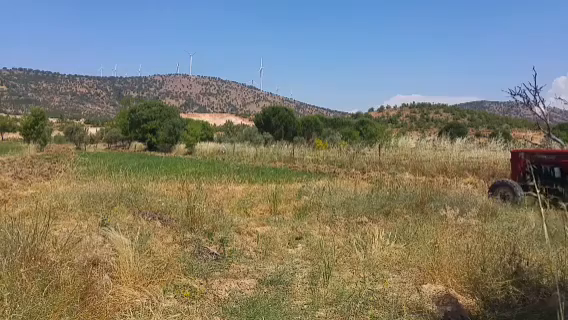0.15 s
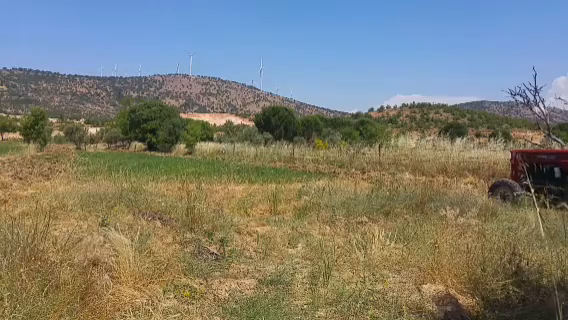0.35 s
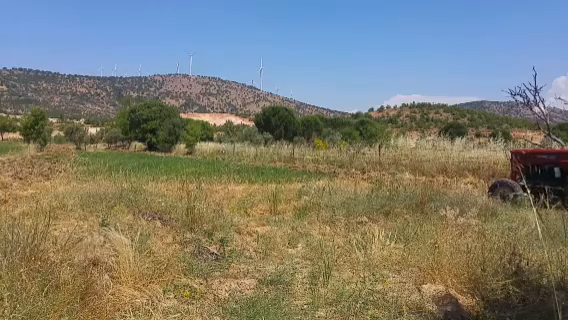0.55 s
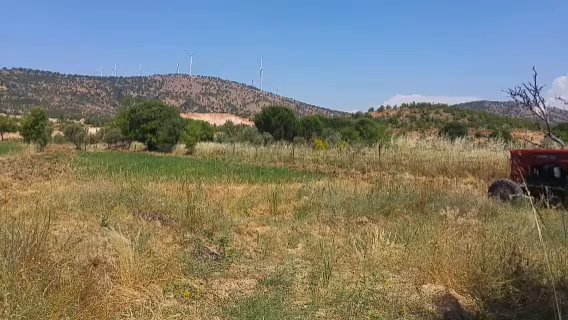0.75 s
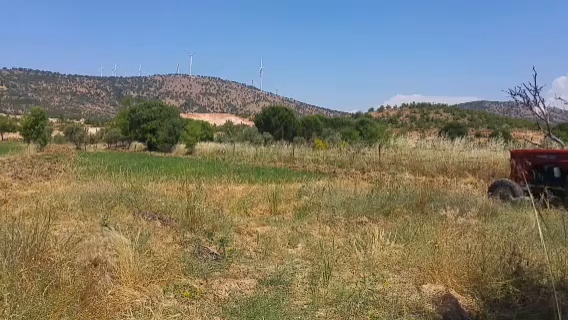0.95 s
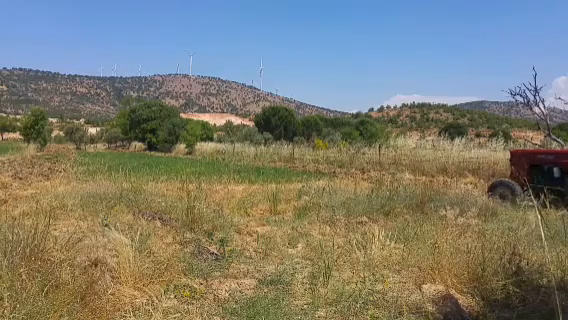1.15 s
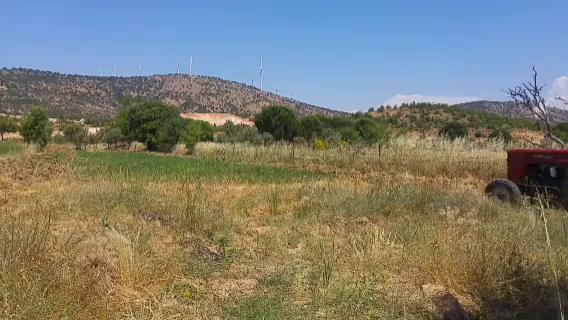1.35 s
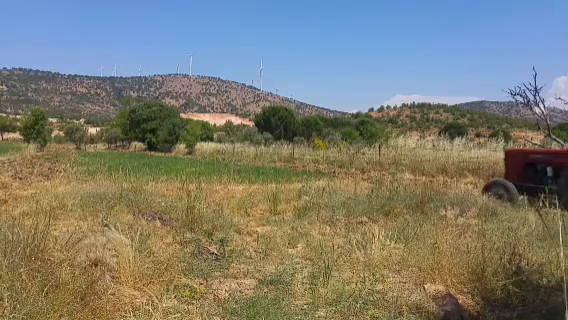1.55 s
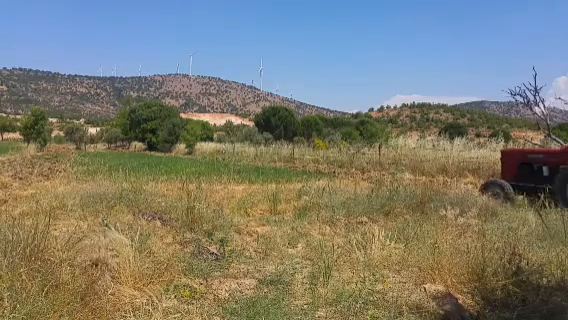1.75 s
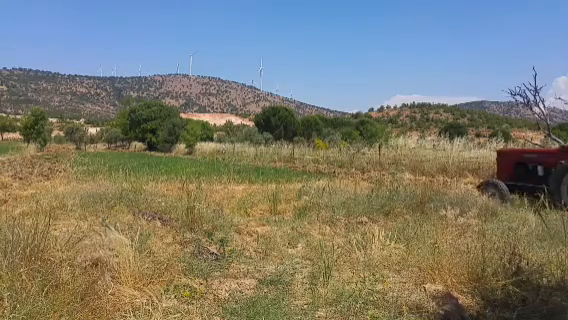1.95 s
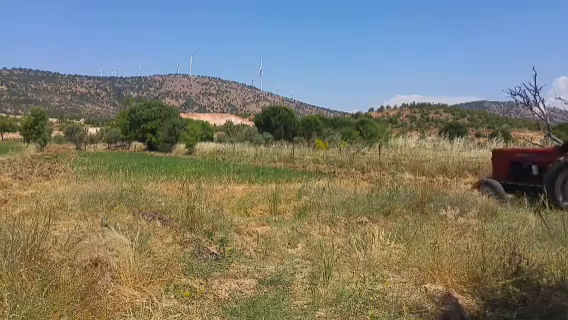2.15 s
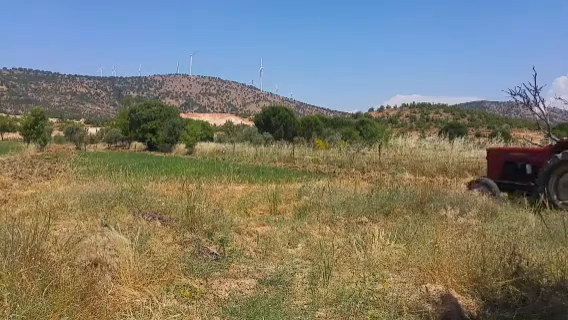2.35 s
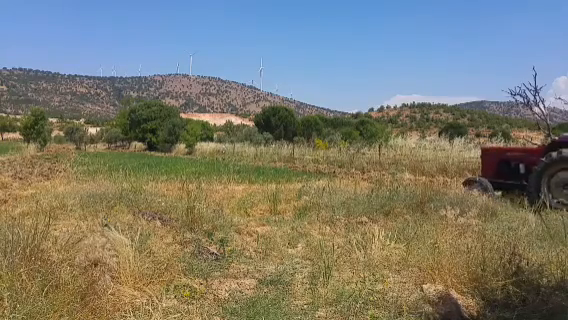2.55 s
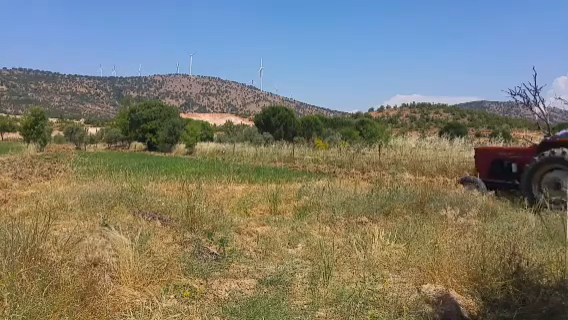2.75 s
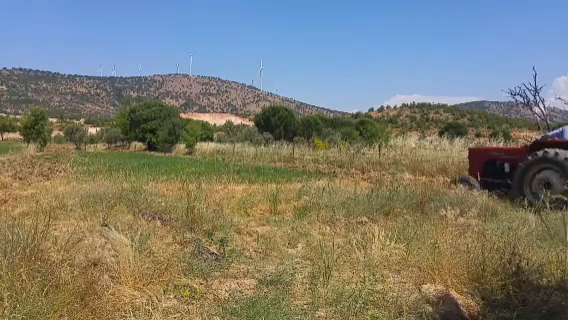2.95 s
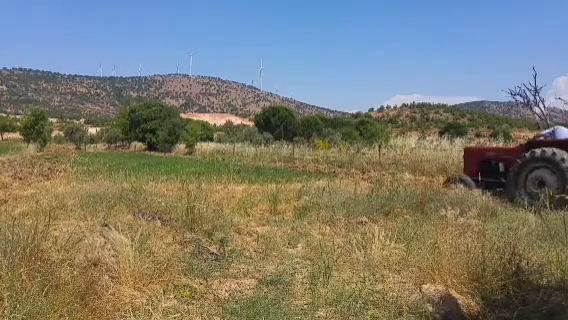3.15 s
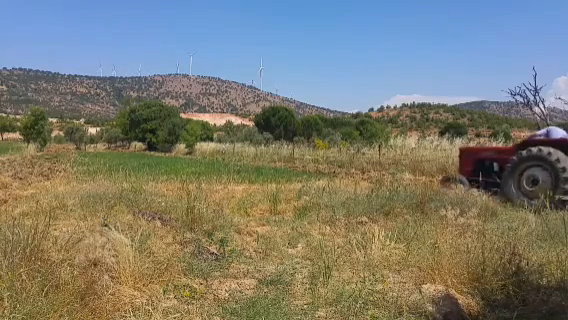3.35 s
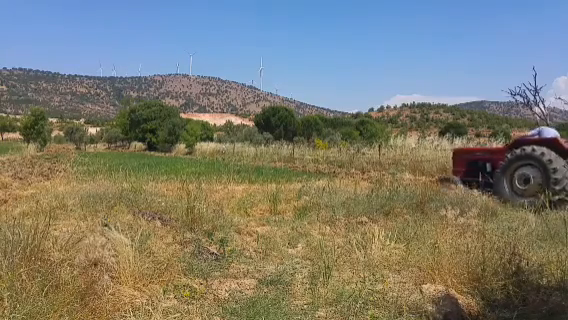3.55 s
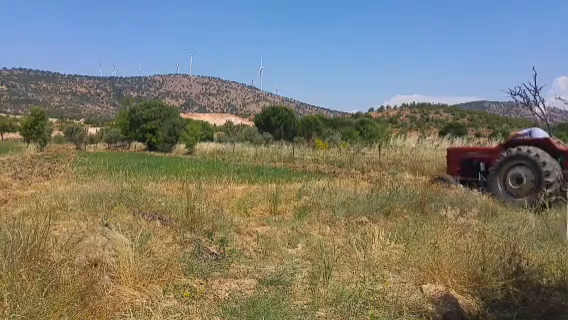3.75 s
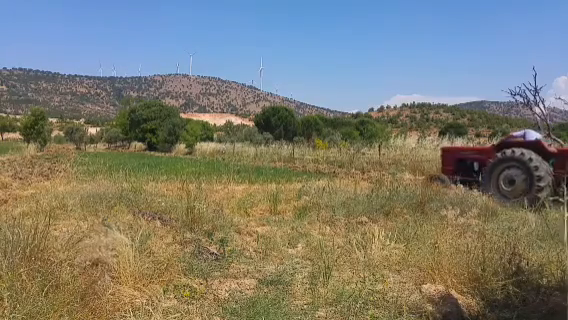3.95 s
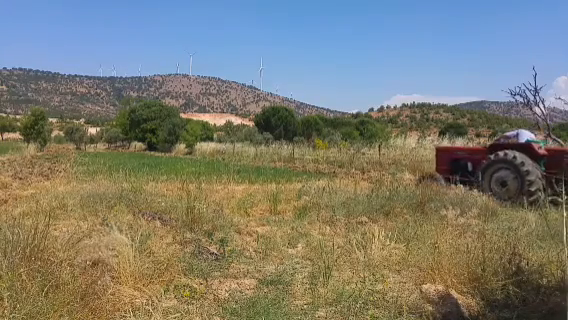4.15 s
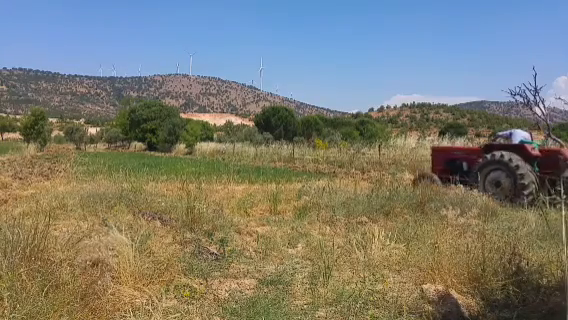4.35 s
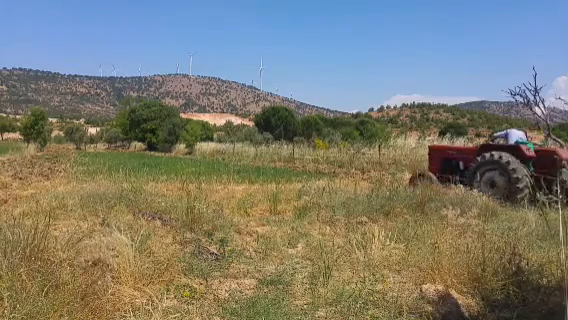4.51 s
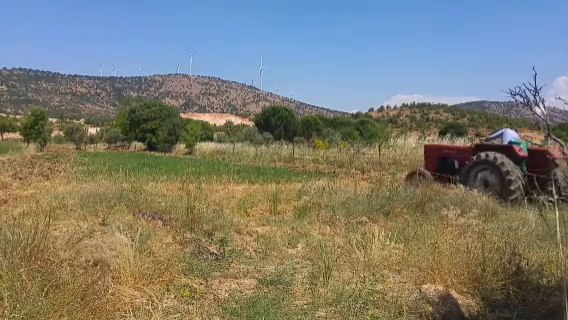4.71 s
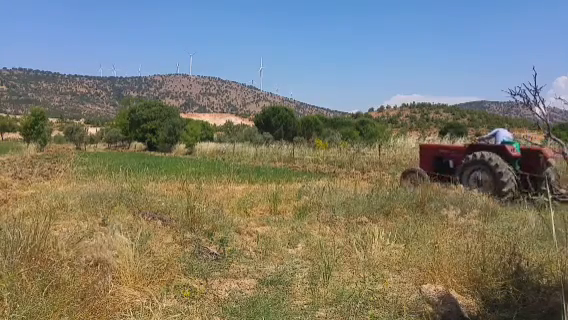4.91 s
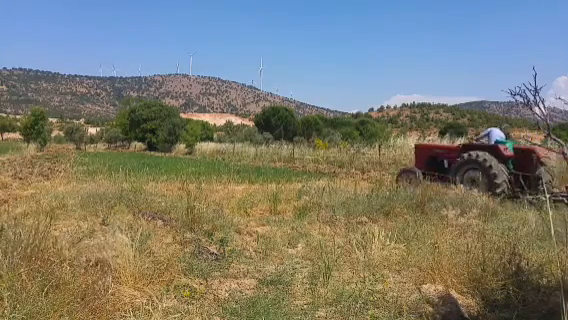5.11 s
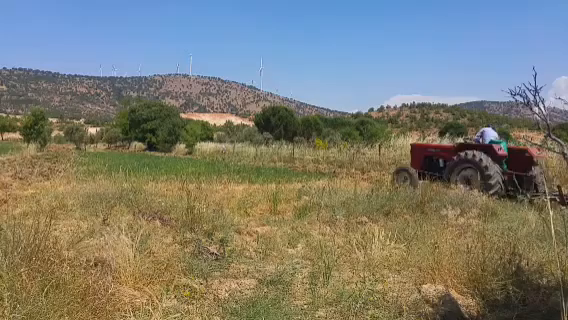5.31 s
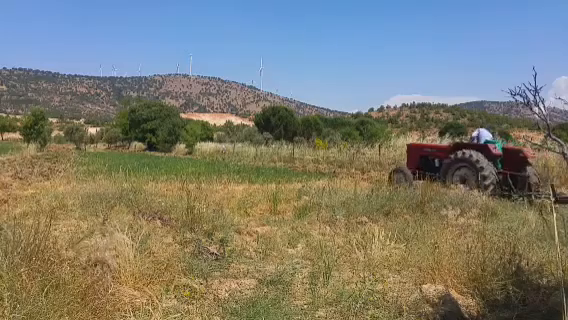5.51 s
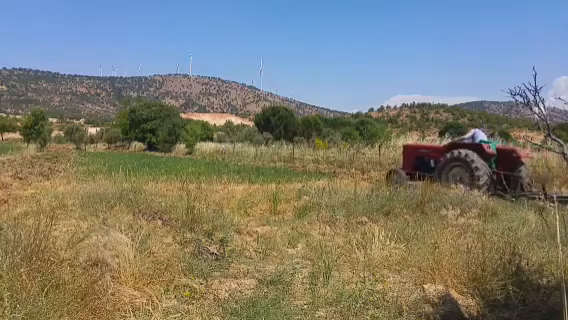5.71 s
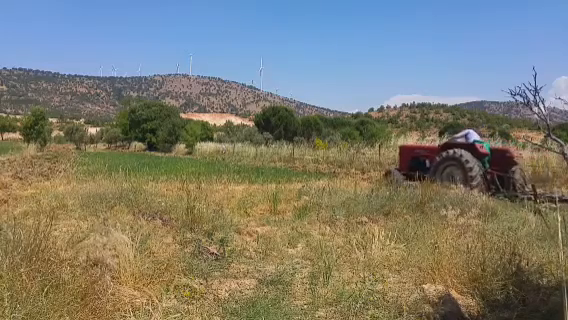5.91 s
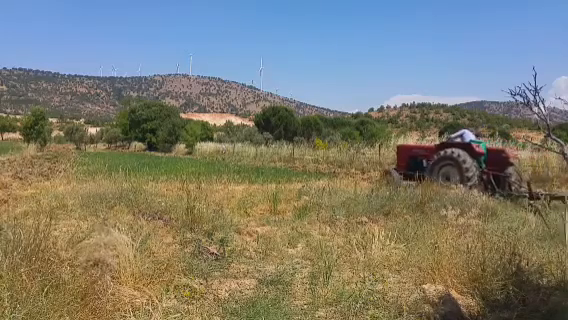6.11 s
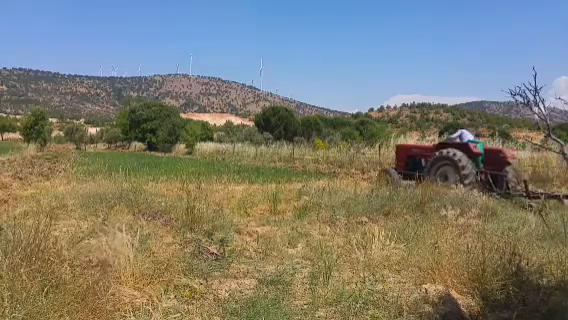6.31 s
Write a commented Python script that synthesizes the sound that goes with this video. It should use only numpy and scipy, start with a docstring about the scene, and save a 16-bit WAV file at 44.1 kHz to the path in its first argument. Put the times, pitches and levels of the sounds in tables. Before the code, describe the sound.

An old three-cylinder diesel tractor idles with a lumpy clatter, revs up in knocking bursts, then works at a steady drone while towed steel clanks.

```python
"""A three-cylinder diesel tractor idles, then revs up under pushes of the throttle and works a harrow at steady speed.
Each firing thumps and barks through the exhaust, shakes the block and rings the intake duct; pushes make it knock.
The harrow's frame booms early; its steel joints clank early and late, with short high notes: a ring, later squeaks.
Late on, a thin metallic tick comes once per engine cycle. Diffuse noise and a fading low hum lie under it all.
The tractor stands to the right: the left microphone hears it later and duller."""
import sys
import numpy as np
from scipy import signal
from scipy.fft import rfft, irfft, next_fast_len
from scipy.io import wavfile
from scipy.ndimage import map_coordinates

SR = 44100
rng = np.random.default_rng(int(sys.argv[2]) if len(sys.argv) > 2 else 0)


def store_wav(level_fs):
    """Save 16-bit WAV to argv[1]."""
    pcm = np.round(np.clip(np.atleast_2d(level_fs), -1, 1) * 32767)
    wavfile.write(sys.argv[1], SR, pcm.T.astype(np.int16))


N = 280917

# The cylinders in firing order. Each row: exhaust level in dB, clatter level in dB, valve click level in dB.
CYLINDERS = [(-2, 4, 1.5), (-2, 4.5, 1), (-2.5, 1.1, -1.8)]

IDLE_RATE = 12.4  # firings per second
BARK_ANGLE = 0.062  # share of a firing interval


def amp(db):
    """Decibels to gain."""
    return 10 ** (np.asarray(db) / 20)


def unit(x):
    """Scale to rms 1."""
    return x / np.sqrt(np.mean(x ** 2) + 1e-20)


def curves(rows):
    """One value per sample for each column after the time."""
    s, *cols = np.transpose(rows)
    return [np.interp(np.arange(N) / SR, s, c) for c in cols]


def wobble(rate):
    """A smooth random curve, rate knots a second."""
    knots = rng.standard_normal(int(N * rate / SR) + 4)
    return map_coordinates(knots, [np.arange(N) * rate / SR])


def response(points, size=8192):
    """Causal, minimum-phase impulse response with the given (Hz, dB) spectrum."""
    f, db = np.transpose(points)
    log_hz = np.log(np.fft.rfftfreq(size, 1 / SR) + 1)
    gain = amp(np.interp(log_hz, np.log(f), db))
    cepstrum = irfft(np.log(gain))
    cepstrum[1:size // 2] *= 2
    cepstrum[size // 2 + 1:] = 0
    return irfft(np.exp(rfft(cepstrum)))


def resonances(modes):
    """Impulse response of (Hz, width Hz, dB) modes, with energy 1."""
    hz = np.fft.rfftfreq(SR // 4, 1 / SR)
    spectrum = 0
    for k, (centre, width, db) in enumerate(modes):
        mode = 1j * hz * width / (centre * centre - hz * hz + 1j * hz * width)
        spectrum = spectrum + (-1) ** k * amp(db) * mode
    ring = irfft(spectrum)
    return ring / np.linalg.norm(ring)


def through(x, impulse):
    """Convolve, keeping the scene's length."""
    return signal.oaconvolve(x, impulse)[:N]


def noise(points):
    """Coloured noise of rms 1."""
    return unit(through(rng.standard_normal(N), response(points)))


def pulses(phase, marks, sizes):
    """An impulse wherever the firing count passes a mark."""
    at = np.searchsorted(phase, marks)
    heard = (at > 0) & (at < N)
    return np.bincount(at[heard], sizes[heard], N)


def after_firing(phase, rate, lead, rise):
    """A quick swell and slower fade, starting lead s before each firing, with mean near 1."""
    u = (phase + lead * rate) % 1 / rate / rise
    return u ** 2 * np.exp(-u) / (2 * rise * rate)


def throttle():
    """How far the driver's pushes open the throttle beyond what the speed needs, 0-1."""
    # Each row: start in s, start of the fall in s, share of the remaining fuel that it adds.
    push_rows = [(1.228, 2.095, 0.14), (1.54, 1.59, 0.63), (2.1, 2.477, 0.68)]
    rise_s, fall_s = 0.06, 0.29
    t = np.arange(N) / SR
    push = np.zeros(N)
    for start, end, share in push_rows:
        opening = np.clip((t - start) / rise_s, 0, 1)
        closing = np.clip(1 - (t - end) / fall_s, 0, 1)
        push += (1 - push) * share * opening * closing
    return np.clip(push, 0, 1)


def fuel_flow(rate, push):
    """Share of full fuel: what the speed needs, the governor's limited correction, and the driver's pushes."""
    work_rate, work_fuel = 29, 0.47  # firings per second, share of full fuel
    governor_gain = 0.023  # fuel share per firing per second below work_rate
    work = np.clip((rate - IDLE_RATE) / (work_rate - IDLE_RATE), 0, 1)
    fuel = np.sqrt(work) * (work_fuel + governor_gain * np.clip(work_rate - rate, -1, 1))
    return np.clip(fuel + (1 - fuel) * push, 0, 1)


def loudness(law, rate, fuel):
    """Level in dB of one part of the engine: it grows with speed and with fuel."""
    idle_db, speed_db, fuel_db, exponent = law
    return idle_db + speed_db * np.log2(rate / IDLE_RATE) + fuel_db * fuel ** abs(exponent)


def thump(phase, rate, delay=.01, width=.008, scatter_db=.4):
    """Each firing sends out one round puff; at working speed the puffs merge into a hum at twice the firing rate."""
    # Puff pitch against speed. Each row: firings per second, centre in Hz.
    puff_rows = [(12.5, 67.5), (22, 80), (33, 90), (40, 86.3)]
    firing = np.arange(int(phase[-1]) + 3)
    cylinder_db = np.array(CYLINDERS)[firing % len(CYLINDERS), 0]
    sizes = amp(cylinder_db + scatter_db * rng.standard_normal(len(firing)))
    hz = np.interp(rate, *np.transpose(puff_rows))
    out = np.zeros(N)
    for neighbour in range(-1, 2):
        k = phase.astype(int) + neighbour
        t = (phase - k) / rate - delay
        out += sizes[k] * np.cos(2 * np.pi * hz * t) * np.exp(-.5 * (t / width) ** 2)
    return out / np.sqrt(rate * width)


def gas_pulses(phase, rate, angle, spectrum, scatter_db):
    """One sharp pressure front per firing, at a fixed crank angle, rings a duct."""
    firing = np.arange(int(phase[-1]) + 1)
    cylinder_db = np.array(CYLINDERS)[firing % len(CYLINDERS), 0]
    sizes = amp(cylinder_db + scatter_db * rng.standard_normal(len(firing)))
    duct = response(spectrum)
    duct = duct / np.linalg.norm(duct)
    return -through(pulses(phase, firing + angle, sizes), duct) * np.sqrt(SR / rate)


def exhaust_bark(phase, rate):
    """The pressure front of each firing rings the exhaust pipe."""
    # Each row: frequency in Hz, relative level in dB.
    pipe = [(50, -22), (110, 8), (165, -4.5), (200, 0), (250, -6), (300, -8), (360, -8), (450, -19),
            (700, -37), (1100, -60)]
    return gas_pulses(phase, rate, BARK_ANGLE, pipe, scatter_db=1.5)


def intake_gulp(phase, rate):
    """A gulp after each firing rings the intake duct, which turns away from the microphones and fades."""
    # Each row: frequency in Hz, relative level in dB.
    intake_duct = [(50, -15), (95, 1), (118, -19), (140, -5), (165, 4.5), (200, 6.5), (240, 3), (280, -9.5),
                   (350, -20), (400, -14), (560, -8.5), (650, -22), (730, -22.5), (1100, -27.5)]
    # Each row: time in s, level in dB.
    intake_facing = [(4.3, 1), (4.8, -1)]
    gulps = gas_pulses(phase, rate, .63, intake_duct, scatter_db=0.6)
    return amp(curves(intake_facing)[0]) * gulps


def strikes(phase, rate, ring_t60, cylinder_db, count=12):
    """Valves, pistons and pump strike near fixed crank angles; each part has its own ring and differs by cylinder."""
    firing = np.arange(int(phase[-1]) + 1)
    t = np.arange(SR // 10) / SR
    out = np.zeros(N)
    for angle in (np.arange(count) + rng.random(count)) / count:
        # columns of both: timing, level
        habit = rng.uniform(-1, 1, (len(CYLINDERS), 2))[firing % len(CYLINDERS)]
        chance = rng.uniform(-0.92, 1, (len(firing), 2))
        marks = firing + angle + .007 * habit[:, 0] + .0016 * chance[:, 0]
        sizes = amp(cylinder_db * habit[:, 1] + 2 * chance[:, 1])
        ring = rng.standard_normal(len(t)) * amp(-60 * t / ring_t60)
        out += through(pulses(phase, marks, sizes), ring)
    return unit(out / np.sqrt(rate))


def valve_beat(phase, rate):
    """The valve gear chatters twice per firing and rests as the exhaust puffs; most distinct at idle."""
    valve_angle = 0.31  # share of a firing interval
    beat = np.cos(4 * np.pi * (phase - valve_angle)) - .4 * np.cos(2 * np.pi * (phase - BARK_ANGLE))
    return beat * (IDLE_RATE / rate) ** 2


def knocking(phase, rate, push, share):
    """Gain that gathers a share of a sound into a burst at each injection while the throttle is pushed."""
    lead_s, rise_s, exponent = .0095, .0031, .32
    knock = np.clip(share * push ** exponent, 0, .95)
    return np.sqrt(1 - knock + knock * after_firing(phase, rate, lead_s, rise_s))


def clatter(phase, rate, push, modes_db=-5, valve_db=3.0, knock_share=0.21, uneven_db=.5):
    """The block and its covers ring under the regular strikes and a little loose rattle."""
    # Each row: frequency in Hz, relative level in dB.
    block = [(30, -40), (100, -12), (145, -13), (174, -10), (235, -5), (290, -1.5), (350, -6.5), (405, -1),
             (600, 0), (730, 2.5), (840, 0), (950, -2), (1040, 0.5), (1180, -4.5), (1280, -1.5), (1450, -2),
             (1750, -6), (2300, -10), (6000, -25.5)]
    # Narrow rings. Each row: centre in Hz, width in Hz, relative level in dB.
    cover_modes = [(395.1, 13.5, -2), (732.6, 25, 5), (1407, 11, -5.5), (1468, 10, -5)]
    rattle = strikes(phase, rate, ring_t60=.07, cylinder_db=3) + .55 * rng.standard_normal(N)
    # shakes most just after a firing, unequally by cylinder
    cylinder_db = np.array(CYLINDERS)[phase.astype(int) % len(CYLINDERS), 1]
    cylinder_db = cylinder_db + np.cos(2 * np.pi * (phase - .2))
    shake_db = cylinder_db * rate / rate.max()
    shake_db += valve_db * valve_beat(phase, rate) * (1 - push)
    shake_db += uneven_db * wobble(24.94)
    rattle *= amp(shake_db) * knocking(phase, rate, push, knock_share)
    covers = through(rattle, resonances(cover_modes))
    return unit(unit(through(rattle, response(block))) + amp(modes_db) * unit(covers))


def rumble():
    """Loose low shaking of the chassis, as coloured noise."""
    # Each row: frequency in Hz, relative level in dB per Hz.
    chassis = [(40, -17.5), (100, -1), (175, -2.5), (300, 1), (420, -8), (700, -17.5), (2000, -72)]
    return noise(chassis)


def panels(x, ring_db, t60):
    """Sheet metal adds a short ring of many close modes."""
    t = np.arange(SR // 20) / SR
    ring = rng.standard_normal(len(t)) * amp(-60 * t / t60)
    return x + amp(ring_db) * through(x, ring / np.linalg.norm(ring))


def rasp(phase, rate, push, flutter_db=1.0, crackle_db=2.0, stroke_db=1.3, tick_db=-1.0,
         idle_top_hz=9000, valve_db=3.5, panel_db=-11, panel_t60=0.019):
    """Bright ticking and hiss, gathered into a crackling burst at each firing when the diesel knocks."""
    # Each row: frequency in Hz, relative level in dB.
    rasp_spectrum = [(700, -23.5), (1800, -0.5), (2600, -4), (3600, -3.5), (5300, -5.5), (6200, 1),
                     (7000, 4.5), (7400, 4.5), (7780, -2), (8400, 4), (9300, -1.5), (10800, -5),
                     (13000, -8.5), (16000, -8)]
    knock_share = .93  # at full push
    chatter_db = valve_db * (1 - push) * (1 + 0.11 * wobble(9.2)) * valve_beat(phase, rate)
    # at speed each cylinder adds a click of its own strength
    click = np.exp(-.5 * ((phase % 1 - .42) / .08) ** 2) * (1 - push) * rate / rate.max()
    click_db = click * np.array(CYLINDERS)[phase.astype(int) % len(CYLINDERS), 2]
    ticks = amp(tick_db) * strikes(phase, rate, ring_t60=0.2, cylinder_db=5) + rng.standard_normal(N)
    hard = unit(through(panels(ticks, panel_db, panel_t60), response(rasp_spectrum)))
    # softer contacts at idle lack the top octave
    lowpass = signal.butter(2, min(idle_top_hz, SR / 3), fs=SR, output="sos")
    soft = signal.sosfiltfilt(lowpass, hard)
    effort = np.clip(np.interp(rate, [12.5, 18], [.15, 1]) + 4 * push, 0, 1)
    grain_db = flutter_db * wobble(160)
    grain_db += push * (crackle_db * wobble(700) + stroke_db * wobble(44.83))
    gain = knocking(phase, rate, push, knock_share) * amp(chatter_db + click_db + grain_db)
    return (soft + effort * (hard - soft)) * gain


def diffuse_noise(phase, rate, push, rasp_db):
    """Diffuse noise, independent in each channel, swells with the knock; weak around 1.6-2 kHz."""
    # Each row: frequency in Hz, relative level in dB per Hz.
    diffuse_spectrum = [(60, 0), (380, 5), (500, -10), (700, 9), (1200, 5), (1600, -18), (2000, -18),
                        (2500, 1), (3500, 0), (7000, 0), (10000, -5), (13000, -8), (16000, -16)]
    gain = amp(rasp_db - 5.0) * knocking(phase, rate, push, share=0.24)
    return gain * np.array([noise(diffuse_spectrum) for _ in range(2)])


def low_hum():
    """A low hum near 47 Hz, independent in each microphone, wavers and fades."""
    # Each row: frequency in Hz, relative level in dB per Hz.
    hum_spectrum = [(15, -15), (32, -10), (47, 20), (70, 15), (200, -39)]
    # Each row: time in s, level in dB.
    hum_level = [(1.5, -43), (3, -49)]
    level_db = curves(hum_level)[0]
    return np.array([amp(level_db + 2 * wobble(2.3)) * noise(hum_spectrum) for _ in range(2)])


def thuds(spread_octaves=0.58, rise_s=0.0034):
    """A jolt makes the harrow's frame boom, mostly in the modes near one pitch."""
    # Each row: start in s, level in dB, ring time (T60) in s, centre in Hz.
    jolts = [(0, -23.5, 0.26, 177), (.045, -31, 0.37, 268), (0.279, -28, 0.2, 274),
             (0.494, -28.5, 0.2, 227), (0.693, -30.5, 0.31, 350), (.72, -26.5, 0.24, 380),
             (1.202, -30.5, 0.53, 295)]
    # Each row: centre in Hz, width in Hz, relative level in dB.
    frame_modes = [(176, 32, 7.5), (202, 24, -4), (284, 47, 3), (348, 28, -2), (440, 67, 7)]
    t = np.arange(SR // 2) / SR
    out = np.zeros(N + SR)
    for s, db, t60, centre_hz in jolts:
        modes = []
        for hz, width, level in frame_modes:
            octaves = np.log2(hz / centre_hz)
            modes.append((hz, width, level - 6 * (octaves / spread_octaves) ** 2))
        boom = unit(through(rng.standard_normal(N), resonances(modes))[-len(t):])
        out[round(s * SR):][:len(t)] += amp(db - 60 * t / t60) * (1 - np.exp(-t / rise_s)) * boom
    return out[:N]


def clanks():
    """Loose steel joints of harrow and hitch knock with a short jangle."""
    # Each row: start in s, level in dB ahead of the steel, decay time (T60) in s, low-pass cutoff in Hz.
    knocks = [(0.129, -30.5, 0.11, 12000), (.273, -25, 0.071, 15000), (.281, -34, 0.084, 12000),
              (.691, -22, 0.1, 14000), (.703, -21, 0.1, 14000), (3.578, -19, 0.17, 5000),
              (3.624, -19, 0.14, 9000), (3.658, -17, 0.1, 6000), (3.976, -16.5, 0.18, 4000),
              (4.027, -18, 0.29, 4440), (4.08, -12.5, 0.066, 15000), (4.148, -18.5, 0.12, 9000),
              (4.472, -16.5, 0.034, 14000)]
    # Each row: centre in Hz, width in Hz, relative level in dB.
    steel_modes = [(750, 2100, 14.5), (2560, 1100, 17.5), (3570, 77, 19), (5860, 2200, 21), (6700, 250, 22),
                   (6750, 240, 23.5), (9300, 6500, 14.5), (10900, 2200, -23), (14200, 2500, -19)]
    t = np.arange(SR // 3) / SR
    jangle = np.zeros(N + SR)
    for s, db, t60, top_hz in knocks:
        contact = signal.butter(2, min(top_hz, .45 * SR), fs=SR, output="sos")
        burst = amp(db - 60 * t / t60) * rng.standard_normal(len(t))
        jangle[round(s * SR):][:len(t)] += signal.sosfilt(contact, burst)
    return through(jangle, resonances(steel_modes))


def high_notes(waver_hz=70):
    """Short high wavering notes: first a clank's ring near 6 kHz, later squeaks of a dry pivot."""
    # Each row: start in s, length in s, start pitch in Hz, end pitch in Hz, level in dB.
    notes = [(0.27, 0.016, 6060, 5930, -27), (3.612, 0.05, 7950, 7920, -22.5),
             (4.02, 0.036, 15540, 15600, -10), (4.055, 0.041, 15500, 15750, -19),
             (4.068, .02, 15100, 15350, -19)]
    out = np.zeros(N)
    for s, length, start_hz, end_hz, db in notes:
        u = np.clip((np.arange(N) / SR - s) / length, 0, 1)
        hz = start_hz + (end_hz - start_hz) * u + waver_hz * wobble(430)
        envelope = np.sqrt(abs(2 * np.sin(np.pi * u)))
        out += amp(db) * envelope * np.sin(2 * np.pi * np.cumsum(hz) / SR)
    return out


def bonnet(push, hz=349, width_hz=9, db=-31):
    """The bonnet drones on one note while the throttle is pushed."""
    drone = unit(through(rng.standard_normal(N), resonances([(hz, width_hz, 0)])))
    return amp(db) * push * drone


def tick(phase, rate, uneven_db=5.0):
    """A thin metallic tick comes once per engine cycle as the flank turns toward the microphones."""
    # Each row: centre in Hz, width in Hz, relative level in dB.
    tick_modes = [(10500, 350, -2), (12260, 550, -2)]
    # Each row: time in s, level in dB.
    tick_facing = [(4, -85), (4.6, -43), (5.4, -45.5), (6.37, -58)]
    cycle, cycle_rate = phase / len(CYLINDERS), rate / len(CYLINDERS)
    once = after_firing(cycle, cycle_rate, lead=-0.0035, rise=0.0029)
    level_db = curves(tick_facing)[0] + uneven_db * wobble(19)
    return amp(level_db) * np.sqrt(once) * through(rng.standard_normal(N), resonances(tick_modes))


def ground(x):
    """The ground reflection cancels a narrow band."""
    # Each row: frequency in Hz, gain in dB.
    ground_gain = [(20, 6), (410, 1), (455, -3), (500, -18.5), (545, 0.5), (610, 1), (16000, 2.5)]
    return through(x, response(ground_gain))


def microphones(x):
    """The right microphone hears the tractor directly, the left one late and shaded."""
    # Lag of the left, shrinking as the tractor moves toward the middle. Each row: time in s, lag in ms.
    lag_rows = [(1.4, 0.24), (2.4, 0.21), (6.37, 0.14)]
    # Shading of the left. Each row: frequency in Hz, gain in dB.
    shade_gain = [(60, -.4), (400, -1), (700, -1.3), (1200, 0), (2200, 0), (2800, -7), (3500, -11),
                  (4800, -10), (6000, -14), (7500, -21), (10000, -19), (13000, -16), (15500, -19)]
    late = np.arange(N) - curves(lag_rows)[0] * SR / 1000
    left = map_coordinates(through(x, response(shade_gain)), [late])
    return np.array([left, x])


def scene():
    """Tractor and harrow over the ground, with a little diffuse noise and a fading low hum."""
    # Each row: time in s, firings per second.
    speed = [(0, 12.34), (1.25, 12.45), (1.5, 13.4), (1.65, 18.21), (1.8, 21.2), (2.05, 23.2), (2.2, 28.65),
             (2.55, 39.75), (2.7, 41.3), (3.2, 39.59), (3.6, 38.91), (3.85, 40.7), (4.35, 40.74),
             (4.75, 38.84), (5.4, 40.2), (5.9, 39.9)]
    # Each law: level in dB at idle, dB per doubling of speed, dB added at full fuel, fuel exponent (sign ignored).
    thump_law, bark_law = (-39, 4, 17.5, 0.51), (-48.5, 1.5, 15, -7.5)
    intake_law, clatter_law = (-51.5, 5, 21, 0.46), (-34, 4.5, 5.5, 1.84)
    rumble_law, rasp_law = (-40.5, 0.5, 6, 2), (-38, 4, 16, 1.74)
    rate = curves(speed)[0]
    phase = .69 + np.cumsum(rate) / SR  # firing count
    push = throttle()
    fuel = fuel_flow(rate, push)
    rasp_db = loudness(rasp_law, rate, fuel)

    engine = amp(loudness(thump_law, rate, fuel)) * thump(phase, rate)
    engine += amp(loudness(bark_law, rate, fuel)) * exhaust_bark(phase, rate)
    engine += amp(loudness(intake_law, rate, fuel)) * intake_gulp(phase, rate)
    engine += amp(loudness(clatter_law, rate, fuel)) * clatter(phase, rate, push)
    engine += amp(loudness(rumble_law, rate, fuel)) * rumble()
    engine += amp(rasp_db) * rasp(phase, rate, push)
    engine += bonnet(push * rate / rate.max())
    engine += tick(phase, rate)

    direct = microphones(ground(engine + thuds() + clanks()) + high_notes())
    return direct + diffuse_noise(phase, rate, push, rasp_db) + low_hum()


def record(dry):
    """The microphones pass nothing above their band limit."""
    top_hz = 15850
    size = next_fast_len(N + SR // 2)
    passed = np.fft.rfftfreq(size, 1 / SR) < top_hz
    return irfft(rfft(dry, size) * passed, size)[:, :N]


dry = scene()
out = record(dry)
store_wav(out)
```